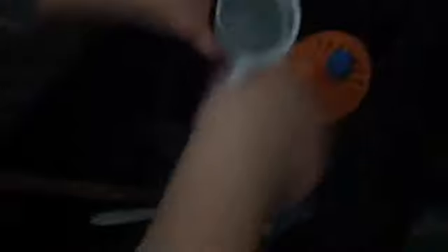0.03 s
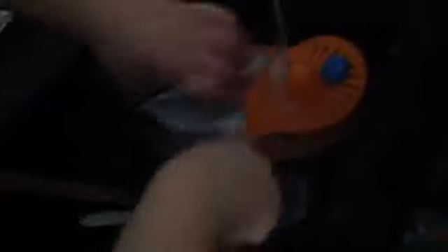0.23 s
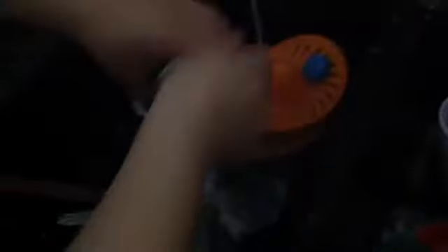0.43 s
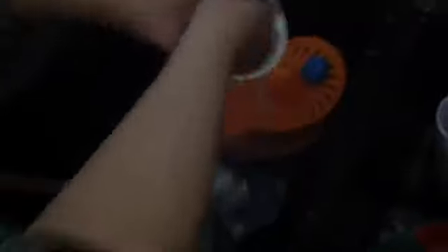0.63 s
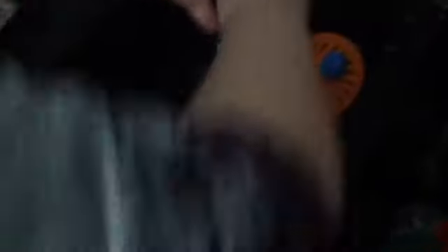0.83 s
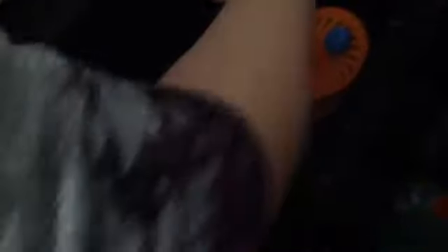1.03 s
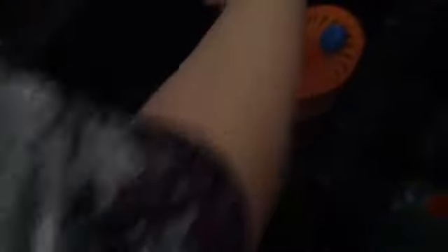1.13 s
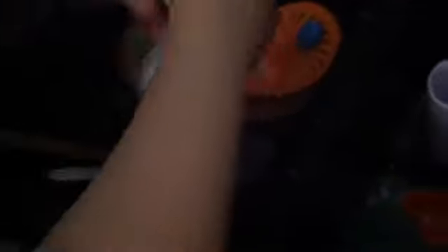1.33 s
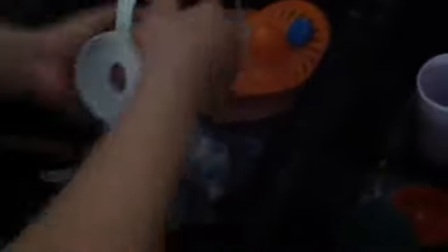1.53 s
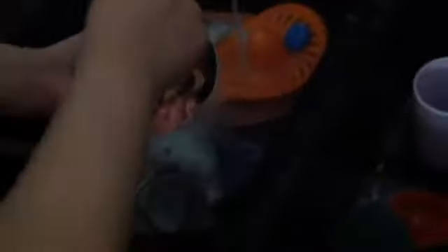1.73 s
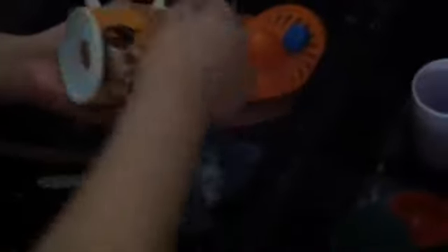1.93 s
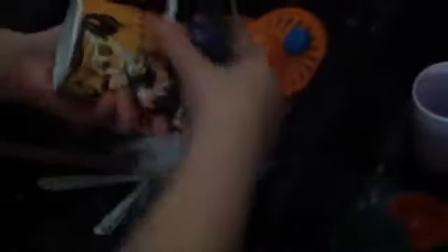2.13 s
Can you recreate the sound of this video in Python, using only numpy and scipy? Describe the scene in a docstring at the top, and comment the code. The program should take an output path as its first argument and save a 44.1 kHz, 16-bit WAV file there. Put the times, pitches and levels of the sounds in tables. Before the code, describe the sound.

Close, mono dish clatter: a bright ceramic clink, rapid knocks and scraping over quiet running water, then a tiny hard tick and a distant triple-blow bang with a long hollow echo, while rinsing water keeps spattering.

```python
"""At a sink in a hard-walled room, a cup clatters against other dishes while a thin stream runs from the tap.
One sharp tick follows, then something heavy bangs further off and echoes on.
The water keeps fizzing and spattering over the cup as it is rinsed.
Dishes, tick and the tones in the bang's echo are fading sine waves; the rest is shaped noise."""
import sys
import numpy as np
from scipy import signal
from scipy.fft import rfft, irfft
from scipy.io import wavfile

SR = 44100
rng = np.random.default_rng(int(sys.argv[2]) if len(sys.argv) > 2 else 0)


def persist_wave(psi):
    """Save psi, clipped to +-1, as 16-bit WAV."""
    counts = np.round(np.clip(psi, -1, 1) * 32767).astype(np.int16)
    wavfile.write(sys.argv[1], SR, np.atleast_2d(counts).T)


N = 97020
TIME, FREQ = np.arange(N) / SR, np.fft.rfftfreq(N, 1 / SR)  # s, Hz


# A t60 is the time in which a sound fades by 60 dB.
def amp(db):
    """Turns decibels into a gain."""
    return 10 ** (np.asarray(db) / 20)


def unit(x):
    """Scales a sound to rms 1."""
    return x / np.sqrt(np.mean(x ** 2) + 1e-20)


def read(points, hz):
    """Reads between the points of a table, along a log-frequency axis."""
    f, value = np.transpose(points)
    return np.interp(np.log(hz + 1), np.log(f + 1), value)


def add(mix, s, sound):
    """Mixes a sound in at time s; what falls outside the scene is cut off."""
    at = round(s * SR)
    sound = sound[max(-at, 0):]
    part = mix[max(at, 0):][:len(sound)]
    part += sound[:len(part)]


def fade(t, t60):
    """Dies away exponentially, by 60 dB in t60 seconds."""
    return np.exp(-np.log(1000) * t / t60)


def noise(gain):
    """Makes noise of rms 1 with the given gain at each frequency."""
    spectrum = rfft(rng.standard_normal(N)) * gain
    return unit(irfft(spectrum, N))


def burst(colour, t60, hold_s=0, size=8192):
    """Makes a puff of coloured noise that holds, then dies away."""
    shape = fade(np.maximum(TIME[:size] - hold_s, 0), t60)
    gain = amp(read(colour, np.fft.rfftfreq(size, 1 / SR)))
    puff = irfft(rfft(rng.standard_normal(size)) * gain) * shape
    # give the puff as much energy as its shape, whatever its colour
    return puff * np.linalg.norm(shape) / np.linalg.norm(puff)


def die_away(x, t60s):
    """Lets each frequency band fade at its own speed."""
    hz, t, bands = signal.stft(x, SR, nperseg=512)
    faded = bands * fade(t, read(t60s, hz)[:, None])
    return signal.istft(faded, SR, nperseg=512)[1][:N]


def grains(per_s, spread_db, colour):
    """Scatters tiny coloured clicks of uneven size at random, rms 1 overall."""
    present = rng.random(N) < per_s / SR
    size = amp(spread_db * np.minimum(rng.exponential(1, N), 4))
    clicks = present * size * rng.choice([-1, 1], N)
    return unit(irfft(rfft(clicks) * amp(read(colour, FREQ)), N))


def wander(hz):
    """Drifts at random with rms 1, mostly slower than the given rate."""
    return noise(1 / (1 + (FREQ / hz) ** 4))


# how long the room echoes: f/Hz, t60/s
ROOM_T60 = [(100, 0.79), (300, 0.94), (1000, 0.66), (3000, 0.72), (6000, 0.49), (14000, 0.46)]


def room(x, gap_s=0.0037):
    """Adds up dense reflections from hard walls, which fade at a different speed in each band."""
    tail = die_away(rng.standard_normal(N), ROOM_T60) * (TIME > gap_s)
    return signal.fftconvolve(x, tail / np.linalg.norm(tail))[:N]


# how the running water changes: t/s, splash level/dB, fizz level/dB
FLOW = [(0, -40.5, -49.5), (.17, -44.5, -53), (.55, -45, -43.5), (.67, -49, -41), (.75, -43.5, -40.5),
        (1.1, -45.5, -48.5), (1.35, -46.5, -45), (1.55, -44.5, -45), (1.68, -45, -45), (1.82, -46, -39.5),
        (1.93, -47, -42), (2.2, -46, -47)]
# colour of the splash in the basin: f/Hz, relative level/dB per Hz
SPLASH_COLOUR = [(25, -11), (60, -21), (100, -12.5), (170, -1.5), (260, 2.5), (400, -3.5), (650, 2),
                 (1050, -1), (1500, -1.5), (2200, -9.5), (4000, -10), (12000, -14.5)]
# colour of the stream's fizz: f/Hz, relative level/dB per Hz
FIZZ_COLOUR = [(500, -7), (2000, 1), (3000, -4.5), (4200, -5), (6000, 1), (7500, -4), (9500, 0.5),
               (12000, 0), (13800, 5), (15200, 2.5)]
# narrow resonances in the water's noise: f/Hz, width to half gain on each side/Hz, rms level/dB
WHISTLES = [(1447, 68, -53), (2977, 47, -62.5), (6650, 27, -62.5), (8180, 110, -56), (8600, 80, -60),
            (10560, 170, -56.5), (14200, 200, -82)]
SPRAY_PER_S, SPRAY_DB, SPRAY_SPREAD_DB = 540, -5.5, 0.5  # spray level is relative to the steady hiss
FLICKER_DB, FLICKER_HZ, SWELL_DB, SWELL_HZ = 1.3, 60, 0.32, 15  # rms wander of fizz and of splash


def water():
    """The stream splashes, fizzes with tiny droplets and excites a few narrow resonances."""
    s, splash_db, fizz_db = np.transpose(FLOW)
    spray = grains(SPRAY_PER_S, SPRAY_SPREAD_DB, FIZZ_COLOUR)
    hiss = noise(amp(read(FIZZ_COLOUR, FREQ))) + amp(SPRAY_DB) * spray
    fizz = amp(np.interp(TIME, s, fizz_db) + FLICKER_DB * wander(FLICKER_HZ)) * hiss
    splash_level = amp(np.interp(TIME, s, splash_db) + SWELL_DB * wander(SWELL_HZ))
    splash = splash_level * noise(amp(read(SPLASH_COLOUR, FREQ)))
    whistles = sum(amp(db) * noise(1 / (1 + ((FREQ - hz) / width) ** 2)) for hz, width, db in WHISTLES)
    return fizz + splash + whistles


# faint hollow tones, some already under way at the start: t/s, length/s, f/Hz, rms level/dB
HOLLOWS = [(-.03, 0.088, 402, -47), (-.05, 0.21, 268, -47.5), (.57, 0.096, 652, -50),
           (.65, 0.072, 680, -44)]


def hollows(width_hz=30):
    """Brief hollow tones, each a narrow band of noise, swell and sink under the water."""
    out = np.zeros(N)
    for s, length, hz, db in HOLLOWS:
        arch = np.hanning(round(length * SR)) ** .5
        tone = noise(1 / (1 + ((FREQ - hz) / width_hz) ** 2))[:len(arch)]
        add(out, s, amp(db) * unit(arch * tone))
    return out


DETUNE, RING_ATTACK_S = .003, 0.001  # detuning is a random fraction of the pitch


def rung(modes, db_of):
    """Strikes a set of modes, db_of giving the strength at each; the grip detunes them a little together."""
    t = TIME[:SR // 2]
    turns = (1 + DETUNE * rng.standard_normal()) * t
    waves = sum(amp(db + db_of(hz)) * fade(t, t60) * np.sin(2 * np.pi * hz * turns) for hz, db, t60 in modes)
    return waves * np.minimum(t / RING_ATTACK_S, 1)


# dish contacts: t/s, then level/dB of thud, knock, cup clink, cup upper ring, crack, second dish
CONTACTS = [(0.2231, -41, -20, -1, -9, -16.5, -32), (0.2603, -35.5, -27.5, -15, -11.5, -17.5, -32),
            (0.2668, -28.5, -26, -15, -11, -49, -25), (0.2825, -31, -30, -22, -45, -43, -45),
            (0.2933, -39, -29.5, -29, -39, -21.5, -19), (0.2982, -35.5, -29, -32, -33, -20, -14),
            (0.3192, -27.5, -25, -16.5, -30, -16.5, -20), (0.3381, -36.5, -44, -42, -22, -27, -30),
            (0.3660, -41, -40, -35, -23, -34, -45), (0.3818, -39, -36, -22, -34, -34, -33),
            (0.3925, -34, -19, -43, -35, -37, -19.5), (0.4035, -34.5, -33.5, -20.5, -38, -22, -13),
            (0.4128, -30.5, -37, -27, -23, -37, -25), (0.4247, -30.5, -24.5, -30, -36, -21.5, -26),
            (0.4318, -31, -27.5, -30, -36, -33, -33), (0.4480, -38.5, -42, -35, -28, -28.5, -49),
            (0.5422, -41.5, -31, -36, -50, -37, -43)]
# the cup's modes: f/Hz, relative level/dB, t60/s
CUP_MODES = [(1150, -15.5, 0.042), (2306, -21, 0.063), (3185, -22, 0.06), (3117, -6.5, 0.069),
             (3204, -6.5, 0.043), (3300, -7.5, 0.014), (3950, -12, 0.029), (5135, -14, 0.018),
             (5910, -11, 0.039), (6224, -3, 0.046), (8600, -7, 0.024), (10100, -11, 0.021),
             (14800, -8, .025), (15200, -17, .03)]
UPPER_HZ = 5500  # cup modes above this follow the upper ring column
# the second dish's modes: f/Hz, relative level/dB, t60/s
DISH_MODES = [(631, -21.5, 0.18), (1115, -18, 0.16), (1337, -18.5, 0.14), (2276, -10, 0.087),
              (2990, -10, 0.087), (3690, -14, 0.023), (7560, -9, 0.022), (8330, -6, 0.031),
              (9370, -8, 0.028), (10770, -5.5, 0.027)]
# colours of the three noisy parts of a contact: f/Hz, relative level/dB per Hz
THUD_COLOUR = [(30, -42), (60, -39), (85, -8), (140, -8), (260, 7), (420, -9.5), (800, -16), (3000, -60)]
KNOCK_COLOUR = [(150, -49), (450, -14.5), (650, -4.5), (1150, 0.5), (1600, -2.5), (2200, -1.5),
                (3500, -11.5), (8000, -39)]
CRACK_COLOUR = [(400, -44), (1800, -5), (3700, 1.5), (4700, -1), (7000, -2), (8500, -3), (10500, -0.5),
                (12500, -1), (15000, -3)]
THUD_T60, KNOCK_T60, CRACK_T60 = 0.063, 0.024, 0.028  # s
CONTACT_RISE_S, CONTACT_HOLD_S = 0.0018, 0.0042
RING_ROOM_DB, CONTACT_ROOM_DB = -10.5, -.5  # how much of each is sent to the room


def clatter():
    """Each contact thuds in the basin, knocks, cracks and rings both dishes."""
    ring, contact = np.zeros(N), np.zeros(N)
    for s, thud_db, knock_db, clink_db, upper_db, crack_db, dish_db in CONTACTS:
        add(ring, s, rung(CUP_MODES, lambda hz: upper_db if hz > UPPER_HZ else clink_db))
        add(ring, s, rung(DISH_MODES, lambda hz: dish_db))
        thud = amp(thud_db) * burst(THUD_COLOUR, THUD_T60)
        knock = amp(knock_db) * burst(KNOCK_COLOUR, KNOCK_T60, CONTACT_HOLD_S)
        crack = amp(crack_db) * burst(CRACK_COLOUR, CRACK_T60, CONTACT_HOLD_S)
        blow = thud + knock + crack
        add(contact, s, blow * np.minimum(TIME[:len(blow)] / CONTACT_RISE_S, 1))
    return ring + contact + room(amp(RING_ROOM_DB) * ring + amp(CONTACT_ROOM_DB) * contact)


# how strongly the cup scrapes and rattles between contacts: t/s, level/dB
SCRAPE_LEVEL = [(.262, -50), (.29, -29.5), (.34, -32), (.385, -31), (.43, -33), (.50, -58), (.56, -64)]
# colour of the slips: f/Hz, relative level/dB per Hz
SCRAPE_COLOUR = [(300, -15), (900, 0), (2000, -4), (3200, 14), (4600, 0), (6200, 7), (7500, -8),
                 (15000, -4)]
SCRAPE_PER_S = 820  # slips per second


def scrape(spread_db=2, basin_t60=.02):
    """Glaze slides on glaze: a run of tiny slips, smeared by the basin."""
    s, db = np.transpose(SCRAPE_LEVEL)
    slips = grains(SCRAPE_PER_S, spread_db, SCRAPE_COLOUR)
    basin = rng.standard_normal(N) * fade(TIME, basin_t60)
    smeared = unit(signal.fftconvolve(slips, basin)[:N])
    return smeared * np.interp(TIME, s, amp(db), left=0, right=0)


# single drops: t/s, level/dB, f/Hz, t60/s
DROPS = [(.517, -29, 13100, 0.023), (.597, -35, 11700, 0.077), (1.234, -31.5, 9700, 0.016),
         (1.244, -34, 6850, 0.016), (1.2914, -30.5, 12700, 0.036), (1.292, -36.5, 4300, 0.027),
         (1.3244, -29.5, 5070, 0.017), (1.5024, -30, 12900, 0.035), (1.503, -47, 2730, 0.035),
         (1.679, -37.5, 11500, 0.027), (1.762, -44, 2940, .06), (1.796, -35.5, 10800, 0.042),
         (1.817, -40.5, 1590, 0.066), (1.822, -44.5, 2940, 0.087), (1.889, -33.5, 9800, 0.023)]
DROP_ROOM_DB = -7


def drops(width=0.23):
    """Larger drops spatter on the cup and the basin, each a fading band of noise."""
    out = np.zeros(N)
    for s, db, hz, t60 in DROPS:
        # the width is counted in log frequency, so higher drops have wider bands
        band = noise(1 / (1 + (np.log((FREQ + 1) / hz) / width) ** 2))
        add(out, s, amp(db) * band * fade(TIME, t60))
    return out + amp(DROP_ROOM_DB) * room(out)


# the sharp tick's modes: f/Hz, level/dB, t60/s
TICK_MODES = [(13200, -1.5, 0.002), (8000, -8.5, .0014)]
# colour of the tick's tail: f/Hz, relative level/dB per Hz
TICK_COLOUR = [(500, -26), (3000, -27), (6000, -20), (8200, -5), (10000, -12), (13000, -6), (15000, -10)]
TICK_S, TICK_RISE_S = .6229, 0.00012
TICK_TAIL_DB, TICK_TAIL_T60 = -18.5, .022  # dB, s


def tick(room_db=-18):
    """One hard, close tick: a few cycles of ring and a very short noisy tail."""
    out = np.zeros(N)
    ping = sum(amp(db) * fade(TIME, t60) * np.sin(2 * np.pi * hz * TIME) for hz, db, t60 in TICK_MODES)
    add(out, TICK_S, ping * np.minimum(TIME / TICK_RISE_S, 1))
    add(out, TICK_S, amp(TICK_TAIL_DB) * burst(TICK_COLOUR, TICK_TAIL_T60))
    return out + amp(room_db) * room(out)


# the far bang, three blows in quick succession: t/s, level/dB, f/Hz above which it is dull
BLOWS = [(0.7654, -23, 780), (0.7731, -21, 9700), (0.8031, -19, 13700)]
# colour of the bang's wash: f/Hz, relative level/dB per Hz
BANG_COLOUR = [(40, -60), (90, -40), (150, -26), (210, -14), (340, -6), (600, -6.5), (780, 0), (950, 3.5),
               (1220, -3), (1500, 0.5), (1850, 2.5), (2450, -6), (3150, -3), (3800, -8), (7800, -11.5),
               (15000, -10.5)]
# how long the wash lasts: f/Hz, t60/s
BANG_T60 = [(100, 0.67), (260, 1.27), (700, 0.89), (1840, 0.83), (4850, 0.69), (12800, 0.42)]
# steady tones in the bang's echo: f/Hz, level/dB before their shared gain
ECHO_TONES = [(350, -40), (489, -42), (512, -39.5), (653, -53), (783, -39), (896, -36.5), (918, -38),
              (1011, -42), (1045, -37.5), (1324, -38), (1344, -38), (1757, -43), (1849, -37.5),
              (2065, -42.5)]
ECHO_TONES_DB, ECHO_TONES_T60 = 10.5, 0.77  # shared gain of the echo tones in dB, s


def bang(rise_s=0.00067, tones_rise_s=0.049):
    """Three heavy blows close together: washes of noise fading band by band, over slowly rising echo tones."""
    out = np.zeros(N)
    for s, db, dull_hz in BLOWS:
        wash = noise(amp(read(BANG_COLOUR, FREQ)) / np.hypot(1, (FREQ / dull_hz) ** 2))
        add(out, s, amp(db) * die_away(wash, BANG_T60) * np.minimum(TIME / rise_s, 1))
    # each tone starts at a random point of its cycle
    tones = sum(amp(db) * np.sin(2 * np.pi * (hz * TIME + rng.random())) for hz, db in ECHO_TONES)
    tones_shape = fade(TIME, ECHO_TONES_T60) * np.minimum(TIME / tones_rise_s, 1)
    add(out, BLOWS[0][0], amp(ECHO_TONES_DB) * tones * tones_shape)
    return out


def scene():
    """Adds up everything at the sink, in one channel."""
    return (water() + hollows() + clatter() + scrape() + drops() + tick() + bang())[None]


LOW_CUT_HZ, EDGE_HZ = 89, 15300


def record(dry, ceiling=.95):
    """Peaks above the ceiling clip; then the recorder drops the deep bass and the highest treble."""
    clipped = np.clip(dry, -ceiling, ceiling)
    bass_cut = signal.butter(3, LOW_CUT_HZ, "high", fs=SR, output="sos")
    thin = signal.sosfilt(bass_cut, clipped)
    treble_cut = signal.firwin(801, EDGE_HZ, window=("kaiser", 8), fs=SR)
    return signal.oaconvolve(thin, treble_cut[None], "same")


dry = scene()
out = record(dry)
persist_wave(out)
```